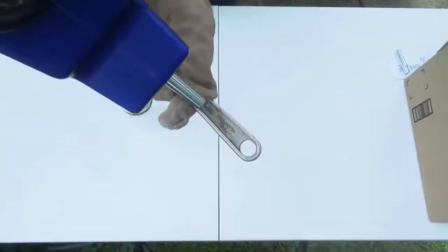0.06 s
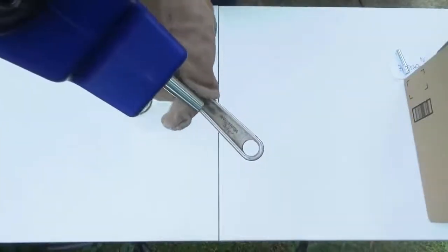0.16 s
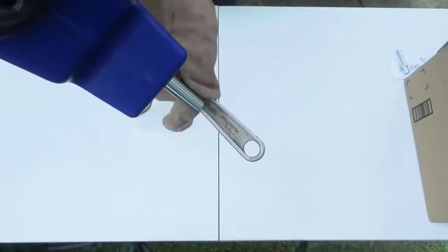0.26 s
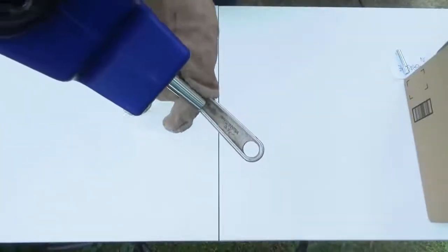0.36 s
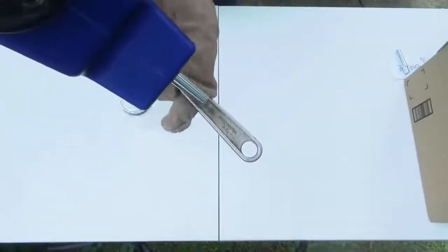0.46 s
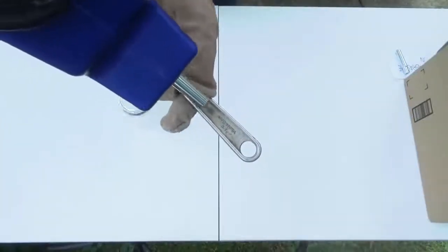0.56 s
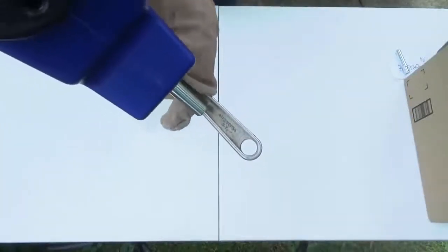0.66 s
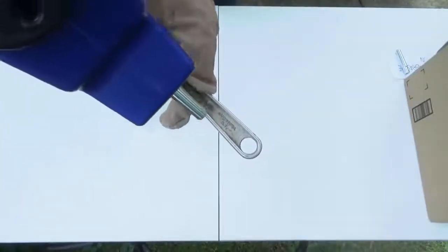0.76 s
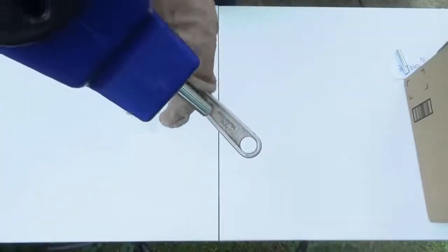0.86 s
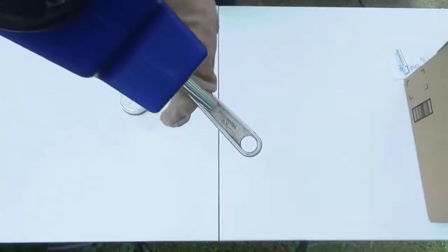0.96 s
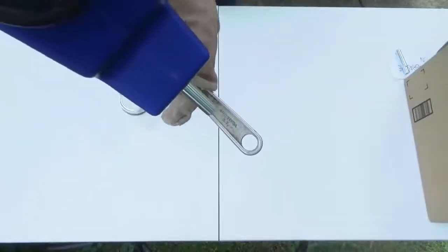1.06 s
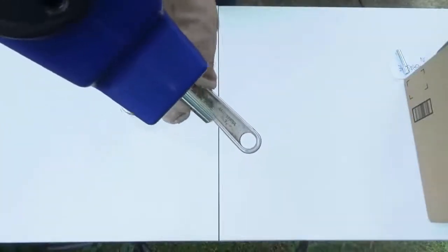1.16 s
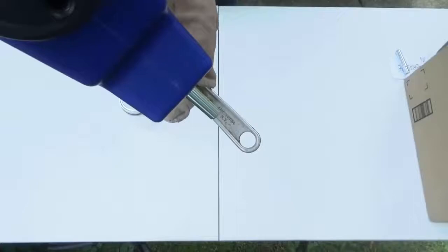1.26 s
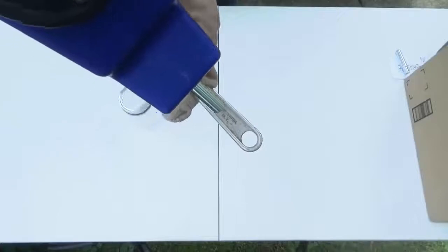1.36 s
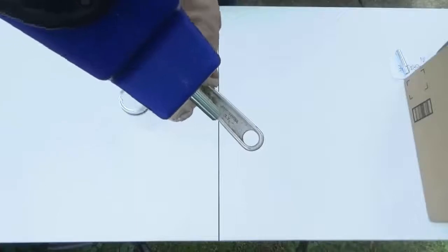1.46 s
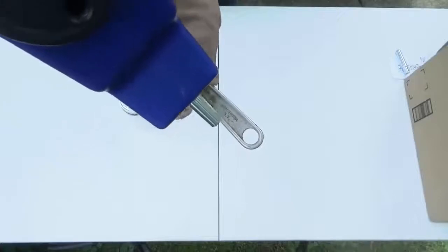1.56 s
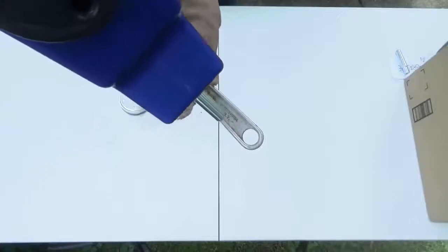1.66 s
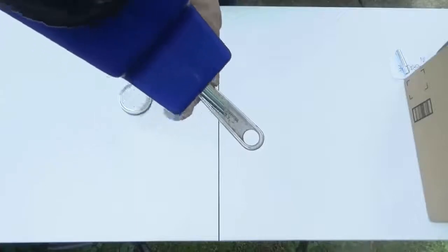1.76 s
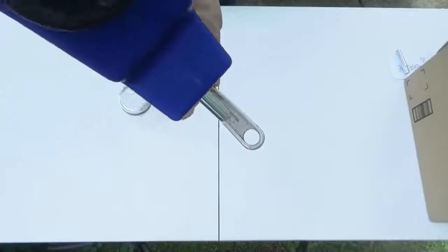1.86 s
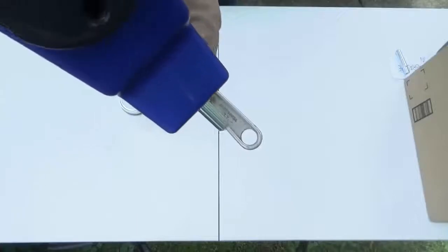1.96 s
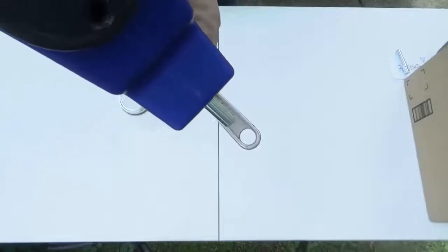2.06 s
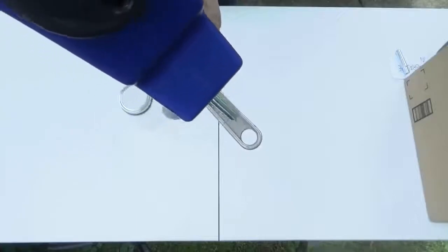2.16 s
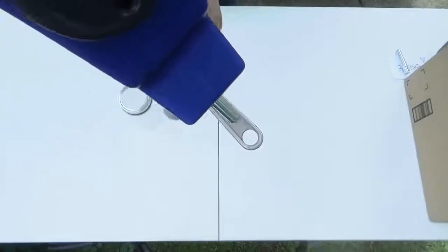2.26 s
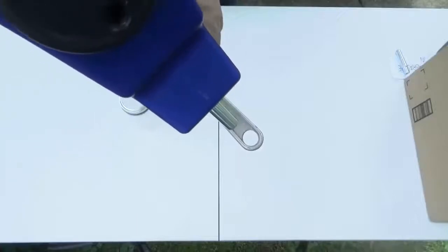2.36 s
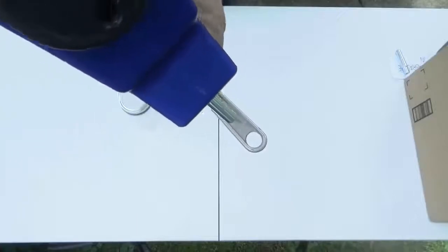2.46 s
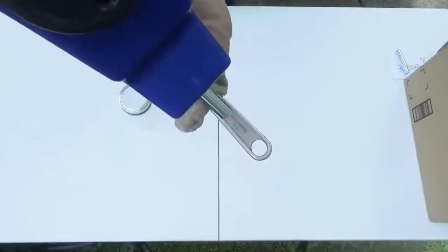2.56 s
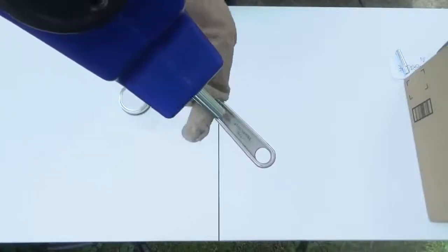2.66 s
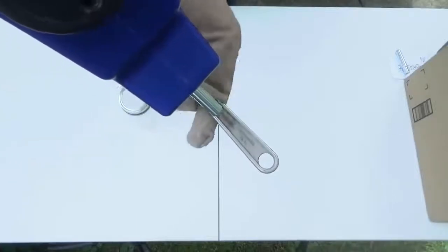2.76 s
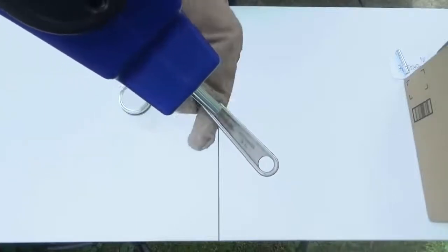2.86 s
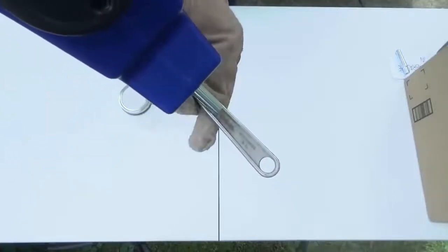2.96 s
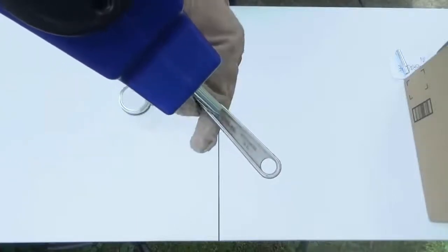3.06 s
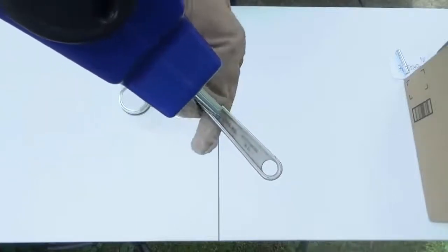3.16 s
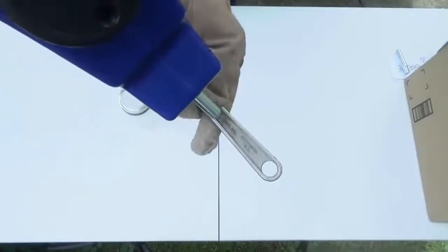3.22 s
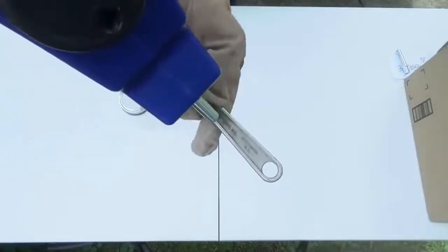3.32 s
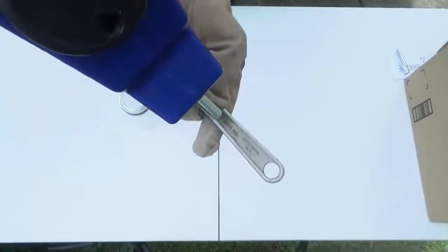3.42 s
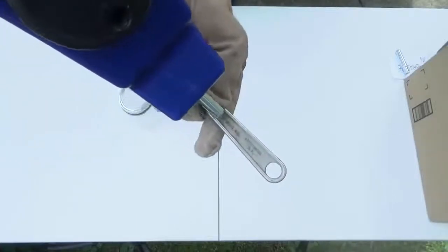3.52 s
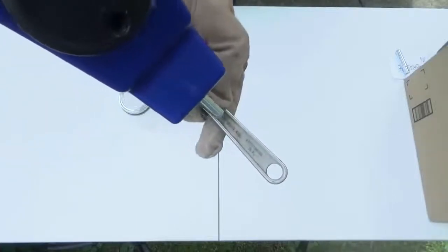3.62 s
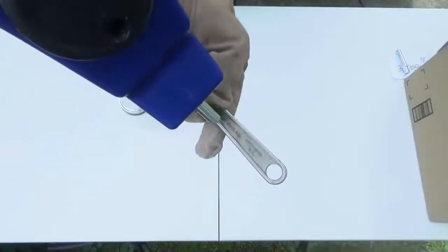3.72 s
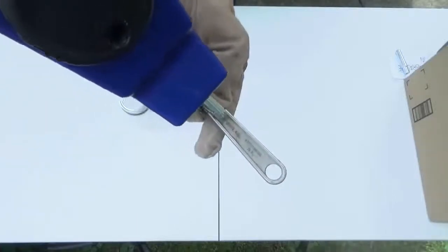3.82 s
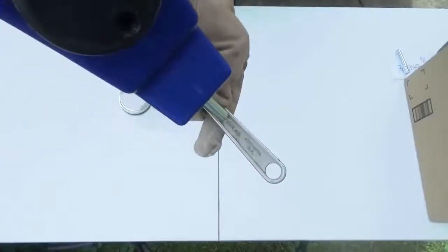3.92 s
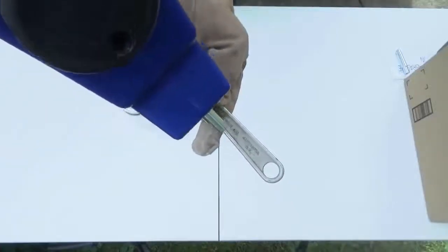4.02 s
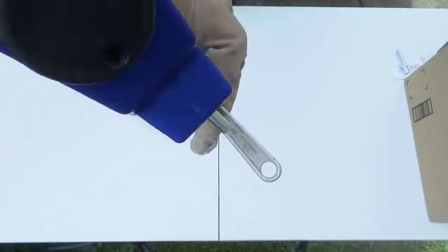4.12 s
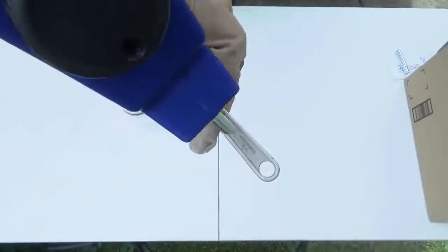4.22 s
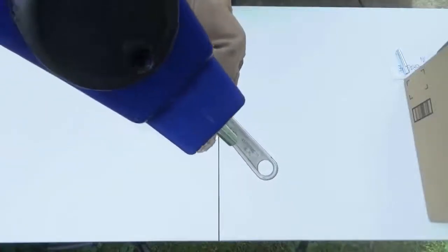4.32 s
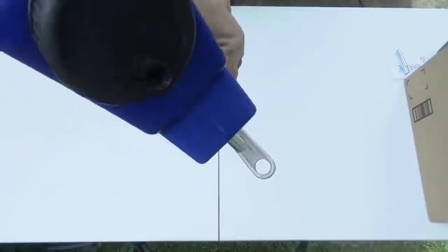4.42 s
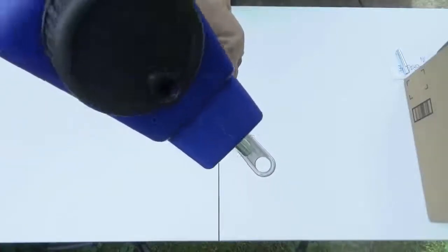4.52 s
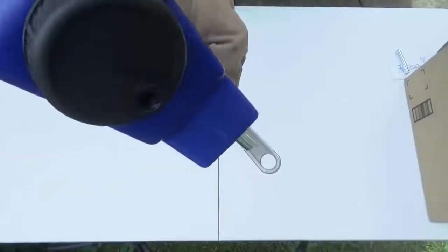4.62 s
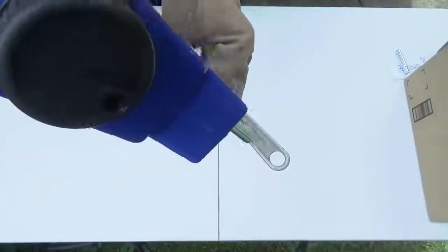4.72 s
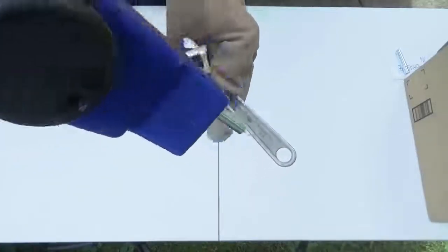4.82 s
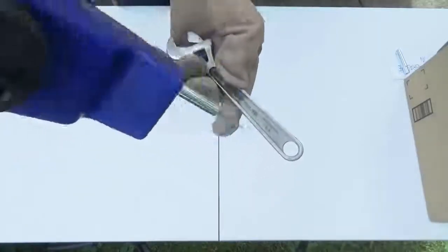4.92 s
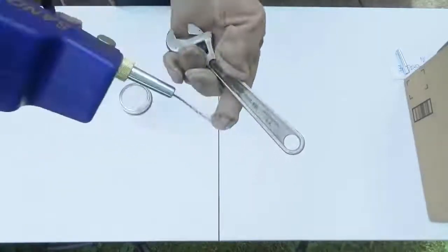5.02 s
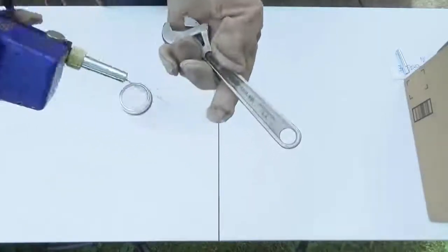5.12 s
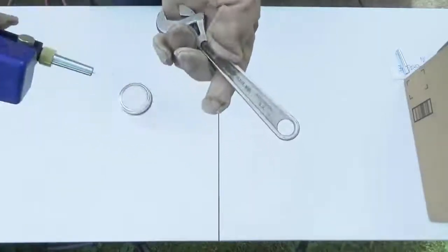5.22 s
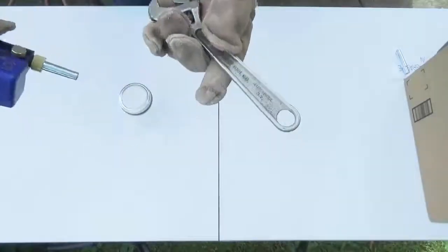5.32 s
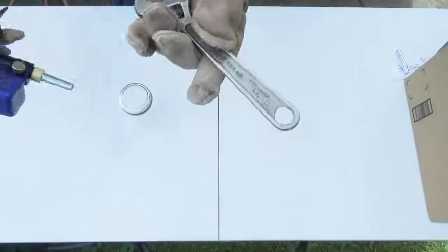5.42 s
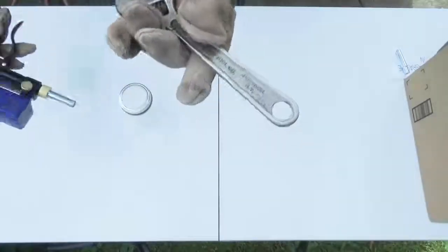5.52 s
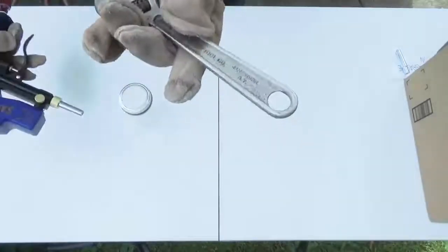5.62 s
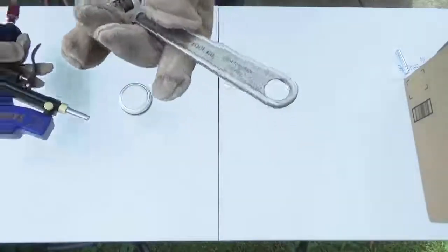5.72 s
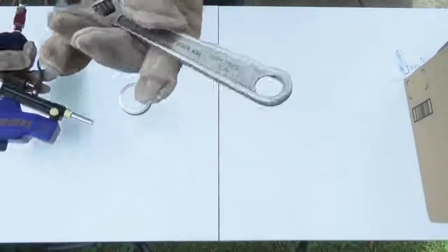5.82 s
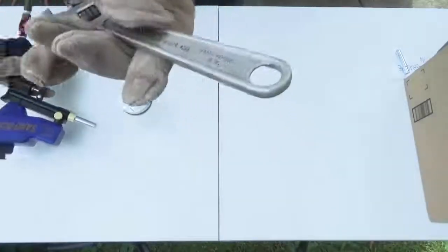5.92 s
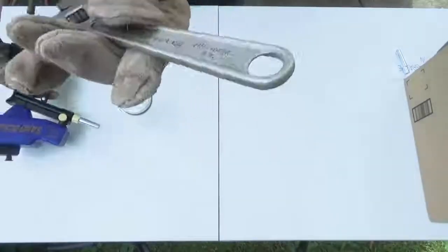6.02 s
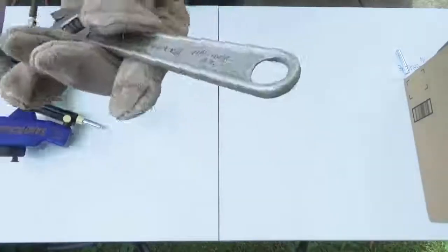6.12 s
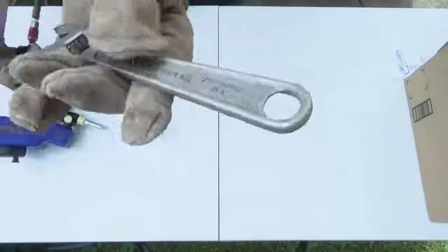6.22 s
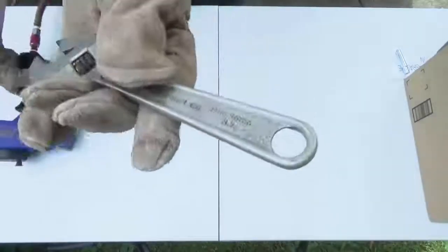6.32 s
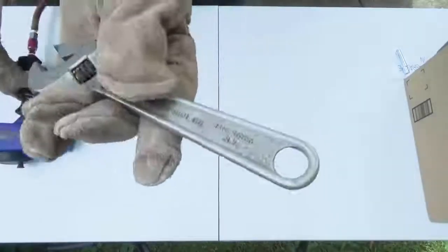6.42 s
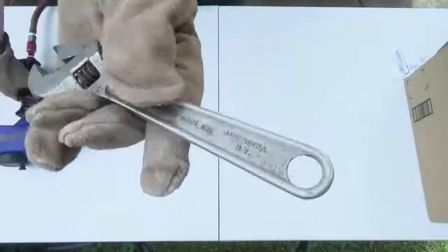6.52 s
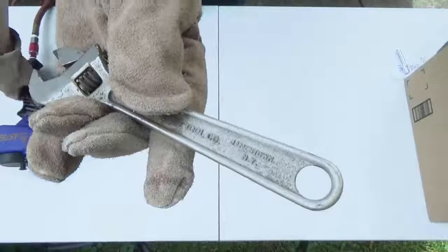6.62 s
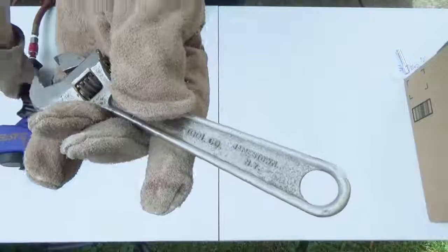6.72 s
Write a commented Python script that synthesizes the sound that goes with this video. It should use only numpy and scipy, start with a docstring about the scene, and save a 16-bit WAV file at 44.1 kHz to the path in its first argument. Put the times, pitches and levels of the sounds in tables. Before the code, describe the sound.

Close, dry and loud, a sandblasting gun hisses harshly on a steel wrench, its bright top swishing and dulling as the nozzle sweeps back and forth. After nearly five seconds it stops sharply with a brief airy tail. Grit shifts softly in the hopper, distant birds chirp over leaf rustle and hum, and the gun is laid on a plastic table with hollow knocks.

```python
"""Sandblasting a wrench outdoors

A hand-held sandblasting gun hisses on a steel wrench, sweeping to and fro: shaped noise with a moving pitch notch.
The trigger is let go and the barrel empties in a short hiss; grit slides in the hopper as lumps of hollow noise.
The gun is laid on a plastic table with a few knocks: fading sine tones with short bursts of noise.
Far birds are gliding sines, over noise for hum, leaf rustle and a faint whine that come up in the quiet."""
import sys
import numpy as np
from scipy import signal
from scipy.fft import rfft, irfft, next_fast_len
from scipy.io import wavfile
from scipy.ndimage import uniform_filter1d, map_coordinates

SR = 44100
rng = np.random.default_rng(int(sys.argv[2]) if len(sys.argv) > 2 else 0)


def bounce(signal):
    """Save signal as a 16-bit WAV file at the path given by the first command-line argument."""
    frames = np.transpose(np.atleast_2d(signal))
    limited = np.clip(frames, -1, 1)
    pcm = np.round(limited * 32767).astype(np.int16)
    wavfile.write(sys.argv[1], SR, pcm)


N = 298998  # length in samples


def amp(db):
    """Turns decibels into gain."""
    return 10 ** (np.asarray(db) / 20)


def unit(x):
    """Scales a sound to an average (rms) strength of 1."""
    return x / np.sqrt(np.mean(x ** 2) + 1e-20)


def along(points, hz):
    """Reads a curve of (pitch_hz, value) points on a log pitch axis."""
    f, v = np.transpose(points)
    return np.interp(np.log(hz + 1), np.log(f + 1), v)


def curves(rows, outside=None):
    """Gives one value per sample for each column after the time column."""
    s, *columns = np.transpose(rows)
    return [np.interp(np.arange(N) / SR, s, column, outside, outside) for column in columns]


def wobble(rate):
    """Draws a smooth random curve through `rate` random points a second."""
    points = rng.standard_normal(int(N * rate / SR) + 4)
    return map_coordinates(points, [np.arange(N) * rate / SR])


def filtered(x, response):
    """Multiplies the spectrum of x by a response, which may be complex."""
    m = next_fast_len(N + SR // 2)
    return irfft(rfft(x, m) * response(np.fft.rfftfreq(m, 1 / SR)), m)[..., :N]


def late(x, ms):
    """Delays x by a time that may move."""
    return map_coordinates(x, [np.arange(N) - ms * SR / 1000], order=3)


def rush(shape_db, patchy_db):
    """Makes steady noise whose colour shape_db(hz, s) may move, with random louder and softer patches."""
    hz, s, z = signal.stft(rng.standard_normal(N), SR, nperseg=512)
    gain = amp(shape_db(hz[:, None], s[None]) + 0 * s)
    # smooth across pitch, then across time
    field = uniform_filter1d(rng.standard_normal(z.shape), size=6, axis=0)
    field = uniform_filter1d(field, size=12, axis=1)
    steady = gain / np.sqrt(np.mean(gain ** 2, axis=0))
    patches = amp(patchy_db * unit(field))
    return unit(signal.istft(z * steady * patches, SR, nperseg=512)[1][:N])


def noise(spectrum, patchy_db):
    """Makes noise of one fixed colour, filtered in one long window so that it can shape the bass."""
    flat = rush(lambda hz, s: 0 * hz, patchy_db)
    return unit(filtered(flat, lambda hz: amp(along(spectrum, hz))))


# Colours of the jet's roar, its splash off the steel and its fizz: pitch_hz, level_db (per Hz, relative)
ROAR_COLOUR = [(18, -68), (30, -38), (146, -29.5), (614, -15), (777, -15), (2690, -0.5), (4210, -0.5),
               (5000, -5.5), (6500, -34), (11000, -120)]
SPLASH_COLOUR = [(3500, -34), (4600, -4), (5800, 0.5), (7000, 0), (8500, -24)]
FIZZ_COLOUR = [(10500, -34), (12300, 3.5), (13500, 1), (14800, 4), (16000, -8.5)]
# Lasting bumps and dips in the blast's colour: pitch_hz, width_hz, level_db
COLOUR_BUMPS = [(3650, 290, 1), (4250, 370, 2.5), (5100, 100, -0.5), (6750, 270, -2.5), (13200, 495, 1)]
# Slow drift of the jet with the nozzle in sight:
# time_s, impact_hiss_db, hiss_centre_hz, fizz_db, off_middle_db (left-right difference)
JET_DRIFT = [(0, -18, 10000, -27.5, -1), (.6, -18, 10200, -23.5, 2), (.93, -19.5, 9300, -24.5, -5.5),
             (1.1, -18, 9900, -23, -4), (1.45, -17.5, 9800, -24, -10), (2.2, -17.5, 9800, -23, -8.5),
             (2.6, -17, 10000, -24, -8), (3.15, -17, 10100, -23.5, 3), (3.42, -19.5, 10200, -21, -4),
             (3.64, -19.5, 9400, -23, -9), (3.83, -19, 10100, -20.5, -11), (4.05, -19, 10000, -21.5, -3),
             (4.25, -17, 10000, -22.5, -7), (4.62, -18, 9300, -23.5, -7.5)]
# Levels of the lower bands: time_s, splash_db, roar_db
LOWER_LEVELS = [(0, -32, -31.5), (.3, -32.5, -30.5), (.5, -32, -31.5), (.62, -30, -31), (.71, -33, -32.5),
                (.93, -22.5, -30), (1.08, -32, -32.5), (1.2, -30, -32), (1.44, -27.5, -31),
                (1.61, -32.5, -32.5), (1.7, -26, -30.5), (1.84, -27.5, -30.5), (2.02, -34, -31.5),
                (2.19, -27.5, -33), (2.32, -32.5, -32.5), (2.57, -27.5, -32), (2.66, -36, -33.5),
                (2.74, -33, -32), (2.9, -39.5, -34.5), (3.15, -36, -33), (3.55, -28, -31),
                (3.8, -29.5, -31.5), (3.95, -27, -28.5), (4.1, -28.5, -31.5), (4.4, -34.5, -33),
                (4.62, -27.5, -31.5)]
# Echoes that follow the moving gun, off the table top and off the glove and wrench:
# time_s, table_late_ms, table_db, glove_late_ms, glove_db
ECHOES = [(0, 3.1, -19, 0.74, -24), (.85, 3.1, -19, 0.65, -30), (1.1, 3.5, -26.5, 0.97, -32),
          (1.5, 2.8, -17.5, .9, -32), (2.1, 2.75, -19, 1, -32), (2.55, 2.8, -20, .95, -30),
          (2.9, 2.75, -18, 0.98, -19.5), (3.9, 3.04, -18, 0.95, -19.5), (4.2, 2.75, -26.5, 0.99, -18),
          (4.62, 2.9, -18, .95, -28)]
# Letting go of the trigger: release_s, fade_s (time to fall 60 dB)
TRIGGER_RELEASE = (4.634, 0.028)
NULL_DB = 11.5  # depth of the notch in full shade
FIZZ_SHADE_DB, HISS_SHADE_DB = -6.5, 1  # level change in full shade
HISS_SINKS = 0.27  # Hz the hiss centre falls per Hz of cancelling pitch


def blast():
    """Air and grit: behind the gun body the fizz is shaded, a null sweeps down and the hiss peaks lower."""
    t = np.arange(N) / SR
    hiss_db, _, fizz_db, _ = curves(JET_DRIFT)
    splash_db, roar_db = curves(LOWER_LEVELS)
    drift_s, centre_hz = np.transpose(JET_DRIFT)[[0, 2]]
    shade, _ = strokes(t)

    def notch(hz, s):
        depth, sunk_hz = strokes(s)
        off_khz = (hz - CLEAR_HZ + sunk_hz) / 1000
        dull_above = 0.28 * (1 + np.tanh(off_khz))
        return -NULL_DB * depth * (np.exp(-(off_khz / 1.1) ** 2) + dull_above)

    def hiss_peak(hz, s):
        centre = np.interp(s, drift_s, centre_hz) - HISS_SINKS * strokes(s)[1]
        octaves_off = np.log2((hz + 1) / centre)
        return -14 * np.log10(1 + (octaves_off / 0.32) ** 4)

    def fizz_shape(hz, s):
        return notch(hz, s) + along(FIZZ_COLOUR, hz)

    feed_db = 0.5 * wobble(6.28) + 0.396 * wobble(24.79)  # the grit is fed unevenly
    hiss_level = amp(hiss_db + HISS_SHADE_DB * shade + feed_db)
    hiss = hiss_level * rush(lambda hz, s: notch(hz, s) + hiss_peak(hz, s), patchy_db=0.5)
    fizz_level = amp(fizz_db + FIZZ_SHADE_DB * shade + feed_db + 0.54 * wobble(4.5))
    fizz = fizz_level * rush(fizz_shape, patchy_db=2.1)
    splash = amp(splash_db + feed_db + 1.2 * wobble(12)) * noise(SPLASH_COLOUR, patchy_db=1.5)
    roar = amp(roar_db + feed_db + 0.55 * wobble(12)) * noise(ROAR_COLOUR, patchy_db=1.43)
    jet = hiss + fizz + splash + roar

    table_ms, table_db, glove_ms, glove_db = curves(ECHOES)
    # each echo is a delayed copy of the jet alone; neither repeats the other
    jet = jet + amp(table_db) * late(jet, table_ms) + amp(glove_db) * late(jet, glove_ms)
    release_s, fade_s = TRIGGER_RELEASE
    fade = amp(-60 * np.maximum(t - release_s, 0) / fade_s)

    def bumps(hz):
        return amp(sum(db * np.exp(-((hz - c) / w) ** 2) for c, w, db in COLOUR_BUMPS))

    return filtered(jet * fade, bumps)


# Strokes that take the nozzle behind the gun body:
# deepest_s, length_s, lowest_cancelling_pitch_hz, shade (0-1)
NOZZLE_STROKES = [(.25, .54, 12800, 0.92), (.77, .24, 14900, .5), (1.207, 0.28, 14600, .95),
                  (1.58, .3, 15000, .6), (1.99, .3, 14700, 1), (2.42, .2, 15300, .5), (2.74, .36, 12400, 1),
                  (3.93, 0.17, 10800, .35), (4.4, .3, 13900, 0.94)]
CLEAR_HZ = 15620  # cancelling pitch with the nozzle in sight
GOING_IN = 0.42  # share of a stroke spent going in
SQUARE = 0.86  # power on the arch: lower is more flat-topped


def strokes(s):
    """Gives shade and the fall in cancelling pitch (Hz) at times s: each stroke is an arch, quicker in than out."""
    shade, sunk_hz = 0, 0
    for deepest, length, low_hz, depth in NOZZLE_STROKES:
        side_length = length * np.where(s < deepest, GOING_IN, 1 - GOING_IN)
        arch = np.clip(1 - ((s - deepest) / side_length) ** 2, 0, 1)
        shade = shade + depth * arch ** SQUARE
        sunk_hz = sunk_hz + (CLEAR_HZ - low_hz) * arch
    return shade, sunk_hz


# Colour of the air left in the barrel: pitch_hz, level_db (per Hz, relative)
BARREL_COLOUR = [(1000, -28), (2000, -7.5), (3500, 3), (6000, -7), (9000, -2), (12000, -14)]


def bleed():
    """After the trigger is let go, the barrel empties in a short fading hiss."""
    after = np.arange(N) / SR - TRIGGER_RELEASE[0]
    level_db = -38.5 - 60 * np.maximum(after, 0) / 0.13 + 1.3 * wobble(60)
    return (after > 0) * amp(level_db) * noise(BARREL_COLOUR, patchy_db=-1.0)


# Ringing tones of the plastic table: pitch_hz, level_db (relative), ring_s (time to fall 60 dB)
TABLE_TONES = [(85, -12, .09), (122, -2, 0.18), (169, 0.5, 0.18), (196, -7.5, 0.13), (238, -9, 0.097),
               (309, 2, .13), (345, -6, 0.094), (400, -2.5, 0.097), (455, -10, 0.076), (532, -9.5, .12),
               (681, -7, 0.086), (740, -10, 0.11), (840, -8.5, 0.19), (1030, -22, 0.074), (1214, -10, 0.1),
               (1430, -19, .07), (1720, -19, .08), (2250, -18, .06)]
# Contacts of the gun with the table: start_s, ring_db, best_excited_hz, spread_octaves,
# ring_share (multiplies ring_s), clack_db, crack_db
CONTACTS = [(5.161, -41, 1700, 1.3, .35, -61, -72), (6.155, -31, 220, 2.1, 0.66, -40.5, -51),
            (6.166, -28.5, 230, 2, 1.1, -37, -47), (6.188, -41, 300, 1.1, 1.1, -44, -66),
            (6.209, -42, 178, 1.9, 1.7, -58, -66), (6.407, -26, 139, 0.53, 0.66, -49, -51),
            (6.41, -39.5, 500, 1.2, 1.4, -43, -35), (6.428, -35, 260, 1.1, 1, -46, -63),
            (6.489, -42.5, 165, 0.69, 0.99, -56, -64), (6.563, -43, 160, 0.89, 1.4, -59, -62),
            (6.674, -35, 480, 0.88, 0.64, -45.5, -53), (6.679, -36.5, 400, 1, 0.75, -56, -47)]
# Colours of the gun's plastic shell, of grit crushed in the contact, and of the loose table shaking on:
# pitch_hz, level_db (per Hz, relative)
SHELL_COLOUR = [(300, -16), (600, 3.5), (1200, 1), (2000, -3), (3600, -2.5), (5500, -18), (8000, -34)]
CRUSH_COLOUR = [(4000, -10), (6000, -9), (8500, 4), (11000, -6), (15000, -16)]
SHAKE_COLOUR = [(40, -20), (80, -3), (140, 0), (200, -3), (260, -22), (500, -120)]
RUMBLE_DB, RUMBLE_T60_S = -25, 0.8  # level against ring_db; time to fall 60 dB


def knocks():
    """Each contact rings the table tones near its own pitch, shakes the table, clacks the shell and cracks."""
    rings, shake, clack, crack = np.zeros((4, N + SR))
    t = np.arange(SR // 2) / SR
    draws = rng.standard_normal((len(CONTACTS), len(TABLE_TONES)))  # each blow lands a little differently
    for contact, draw in zip(CONTACTS, draws):
        start_s, ring_db, centre_hz, octaves, share, clack_db, crack_db = contact
        ring = 0
        for (hz, level_db, t60), extra_db in zip(TABLE_TONES, draw):
            off_db = -6.4 * (np.log2(hz / centre_hz) / octaves) ** 2
            fade_db = -60 * t / (share * t60)
            ring = ring + amp(level_db + extra_db + off_db + fade_db) * np.sin(2 * np.pi * hz * t)
        start = round(start_s * SR)
        span = slice(start, start + len(t))
        # minus: the top is pushed away first
        rings[span] -= amp(ring_db) * ring * (1 - np.exp(-t / 0.00091))
        shake[span] += amp(ring_db + RUMBLE_DB - 60 * t / RUMBLE_T60_S) * (1 - np.exp(-t / 0.016))
        clack[span] += amp(clack_db - 60 * t / 0.071)
        crack[span] += amp(crack_db - 60 * t / 0.02)
    out = rings[:N] + shake[:N] * noise(SHAKE_COLOUR, patchy_db=0)
    out = out + clack[:N] * noise(SHELL_COLOUR, patchy_db=-1)
    return out + crack[:N] * noise(CRUSH_COLOUR, patchy_db=0)


# Hollow tones of the hopper: pitch_hz, width_hz, level_db (relative)
HOPPER_TONES = [(329, 60, -0.5), (397, 60, 2), (520, 110, -14)]
# Grit slipping in the hopper: start_s, level_db (before the rise and fade)
GRIT_LUMPS = [(4.98, -52), (5.022, -48), (5.055, -59), (5.08, -55.5), (5.132, -53), (5.165, -55)]
LUMP_RISE_S, LUMP_T60_S = 0.0056, 0.18  # rise time; time to fall 60 dB


def hopper():
    """Loose grit slides in lumps: bursts of noise sound the hollow hopper's resonances."""
    level = 0
    for start_s, db in GRIT_LUMPS:
        since = np.maximum(np.arange(N) / SR - start_s, 0)
        level = level + amp(db - 60 * since / LUMP_T60_S) * (1 - np.exp(-since / LUMP_RISE_S))

    def hollow(f):
        response = 0
        for k, (c, w, db) in enumerate(HOPPER_TONES):
            resonance = 1j * f * w / (c * c - f * f + 1j * f * w)
            response = response + (-1) ** k * amp(db) * resonance  # signs alternate
        return response

    return level * unit(filtered(rng.standard_normal(N), hollow))


# The clearer birds: start_s, length_s, start_pitch_hz, end_pitch_hz, level_db
CLEAR_BIRDS = [(5.02, .051, 5750, 5650, -64), (5.188, .09, 3800, 3700, -65), (5.223, .07, 4300, 3300, -67),
               (5.534, 0.04, 4650, 4000, -58), (5.582, 0.048, 3650, 3590, -63),
               (5.677, 0.09, 3920, 3850, -65), (5.808, 0.047, 5100, 5150, -68),
               (5.91, .068, 4400, 3900, -61.5), (5.98, .07, 3400, 2900, -64),
               (6.257, 0.095, 3400, 3100, -64), (6.44, .04, 3180, 3150, -57), (6.46, .07, 5750, 4800, -66),
               (6.49, .04, 4850, 4800, -60), (6.598, .03, 3200, 3130, -57), (6.632, 0.04, 3100, 3510, -55),
               (6.728, .034, 4650, 4300, -54), (6.755, .025, 4000, 3600, -59)]
# Colour of birds too far to tell apart: pitch_hz, level_db (per Hz, relative)
CHORUS_COLOUR = [(2400, -29), (3000, -4.5), (3800, 0.5), (4700, -1.5), (5600, -7), (6500, -28)]
# Swells of the background: time_s, hum_db, rustle_db (the rustle also guides the fainter birds)
SWELLS = [(4.85, -64, -67), (5.48, -64, -64.5), (5.78, -63, -62.5), (6.37, -58, -59.5),
          (6.78, -58.5, -57.5)]
# fainter chirps: pitch range, length, level over the rustle, widest fall
TWITTER_HZ, TWITTER_S, TWITTER_DB, TWITTER_FALL_HZ = (2980, 5830), 0.06, -6, 500


def birds():
    """Far gliding whistles, blurred by a fast random tremble, over fainter chirps and a patchy chorus."""
    t = np.arange(N) / SR
    far_db = curves(SWELLS)[1]
    out = amp(far_db - 12) * noise(CHORUS_COLOUR, patchy_db=2.6)
    tremble_hz = 170 * wobble(200)
    faint = []
    first_s = SWELLS[0][0]
    for when, pitch, fall in rng.random(size=(24, 3)):
        s = first_s + when * (N / SR - first_s)
        hz = np.interp(pitch, (0, 1), TWITTER_HZ)
        faint.append((s, TWITTER_S, hz, hz - fall * TWITTER_FALL_HZ, far_db[int(s * SR)] + TWITTER_DB))
    for s, length, start_hz, end_hz, db in CLEAR_BIRDS + faint:
        span = slice(int(s * SR), int((s + length) * SR))
        u = (t[span] - s) / length  # 0 to 1 through the whistle
        pitch_hz = start_hz + (end_hz - start_hz) * u + tremble_hz[span]
        whistle = np.sin(2 * np.pi * np.cumsum(pitch_hz) / SR)
        out[span] += amp(db) * np.sin(np.pi * u) * whistle
    return out


# Colours of the far hum and the leaf rustle: pitch_hz, level_db (per Hz, relative)
HUM_COLOUR = [(15, -50.5), (25, -22), (80, -1), (151, -9), (202, -2), (238, -8.5), (570, -8), (1200, -20),
              (1560, -38.5), (2640, -120)]
RUSTLE_COLOUR = [(530, -32.5), (900, -1.5), (2000, -8.5), (2800, -6), (3810, -6.5), (5020, -11),
                 (9120, -8.5), (11900, -18.5), (14000, -42.5), (15600, -52.5)]
# Level of a narrow far whine: time_s, level_db
WHINE_LEVEL = [(5.6, -88), (5.78, -70), (6.0, -64), (6.3, -62), (6.78, -67)]


def background():
    """Far hum, leaf rustle and a narrow whine, each a band of noise with its own level curve."""
    hum_db, rustle_db = curves(SWELLS)
    whine_db, = curves(WHINE_LEVEL, outside=-120)
    whine = noise([(1250, -30), (1550, -6), (1670, 0), (1780, -6), (2100, -30)], patchy_db=0.7)
    rustle = noise(RUSTLE_COLOUR, patchy_db=0.5)
    hum = noise(HUM_COLOUR, patchy_db=1.5)
    return amp(hum_db) * hum + amp(rustle_db) * rustle + amp(whine_db) * whine


# How long the surroundings answer: pitch_hz, fade_s (time to fall 60 dB)
YARD_FADE = [(300, .2), (3000, 0.42), (8000, 0.39), (15000, 0.22)]


def yard(x):
    """The surroundings answer with a tail of noise; each frequency dies at its own speed."""
    hz, t, z = signal.stft(rng.standard_normal(SR // 2), SR, nperseg=256)
    fade = amp(-60 * t / along(YARD_FADE, hz)[:, None])
    tail = signal.istft(z * fade, SR, nperseg=256)[1]
    return signal.fftconvolve(x, tail / np.linalg.norm(tail))[:N]


def unlike(x, spectrum, lean):
    """What differs between the microphones: a lean to the left plus sound scattered over milliseconds."""
    smear = rng.standard_normal(2000) * amp(-np.arange(2000) / 50)
    scattered = signal.fftconvolve(x, smear / np.linalg.norm(smear))[:N]
    return filtered(lean * x + scattered, lambda hz: amp(along(spectrum, hz)))


# Where the jet, and then all else, differs left to right: pitch_hz, level_db (before lean and scatter)
JET_DIFFERENCE = [(6000, -70), (7400, -38.5), (8200, -16), (9500, -23.5), (10800, -33.5), (11800, -63.5)]
OTHER_DIFFERENCE = [(60, -47), (180, -35.5), (550, -17), (1650, -14.5), (4970, -14), (15000, -14.5)]
LEAN_SHADE_DB = 5.5  # added to the jet's left-right difference in full shade


def scene():
    """All sources reach two close microphones almost alike; the birds spread widest."""
    jet, hits, song = blast(), knocks(), birds()
    jet = jet + yard(amp(-24.0) * jet)
    song = song + yard(amp(-2.5) * song)
    rest = bleed() + hits + hopper() + background() + yard(amp(-11.0) * hits)
    shade, _ = strokes(np.arange(N) / SR)
    lean_db = curves(JET_DRIFT)[3] + LEAN_SHADE_DB * shade
    side = amp(lean_db) * unlike(jet, JET_DIFFERENCE, lean=0.7)
    side = side + unlike(rest + amp(3.5) * song, OTHER_DIFFERENCE, lean=0.25)
    middle = jet + song + rest
    return np.array([middle + side, middle - side])


SOFT_TOP, SOFT_KNEE = 0.56, 6  # ceiling of the rounded peaks; how sharply they round off
TOP_HZ = 15780  # nothing is kept above this


def record(dry):
    """The microphone loses the deepest bass, peaks are rounded off, and the top is cut at the band limit."""
    soft = dry / (1 + np.abs(dry / SOFT_TOP) ** SOFT_KNEE) ** (1 / SOFT_KNEE)

    def response(hz):
        bass_cut = (1j * hz / (35 + 1j * hz)) ** 2
        top_cut = np.sin(np.pi / 2 * np.clip((TOP_HZ - hz) / 200, 0, 1)) ** 2
        return bass_cut * top_cut

    return filtered(soft, response)


dry = scene()
out = record(dry)
bounce(out)
```